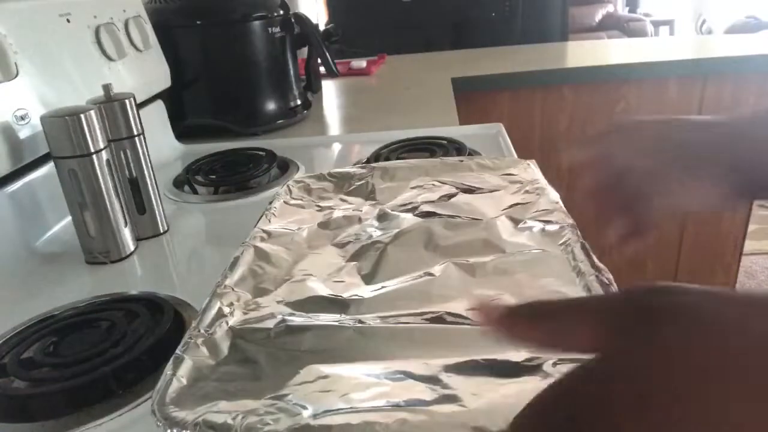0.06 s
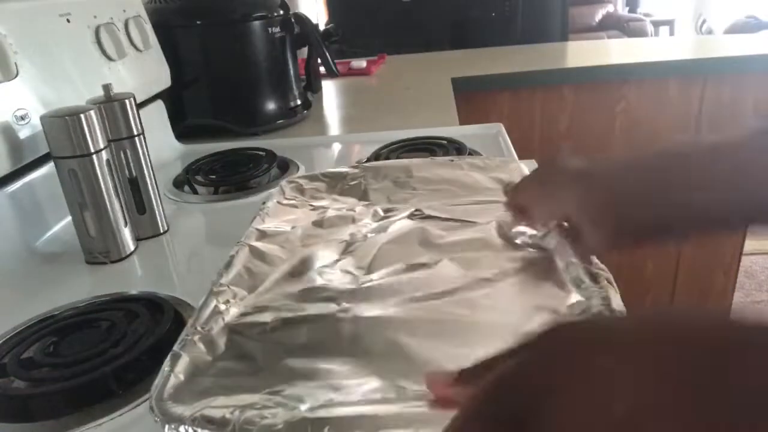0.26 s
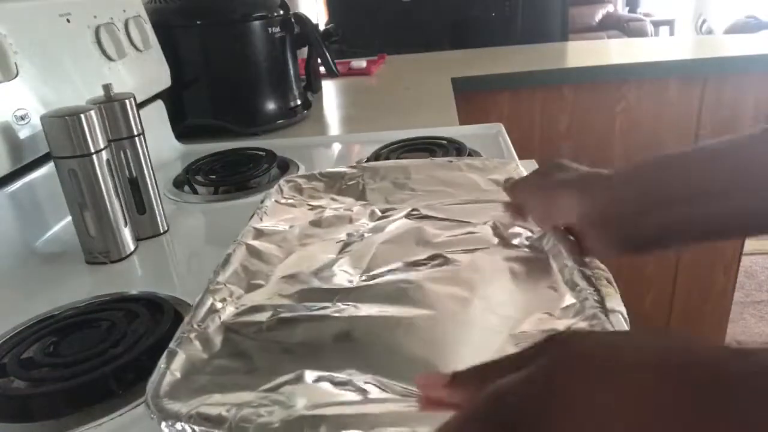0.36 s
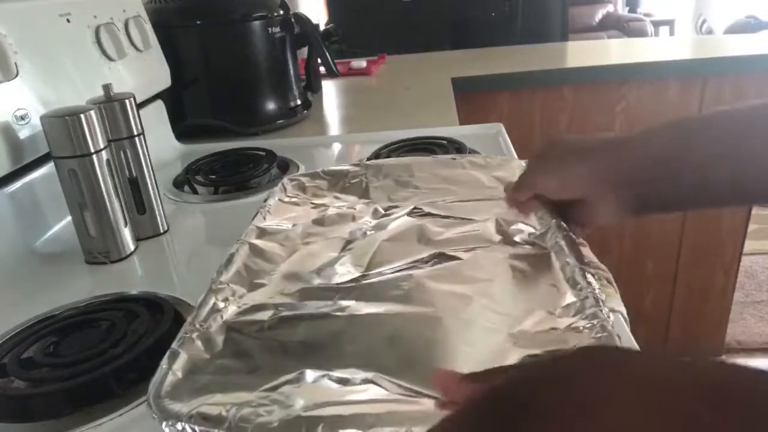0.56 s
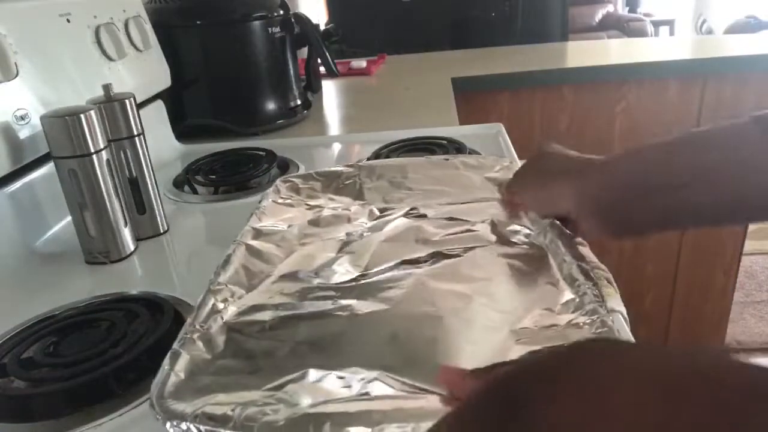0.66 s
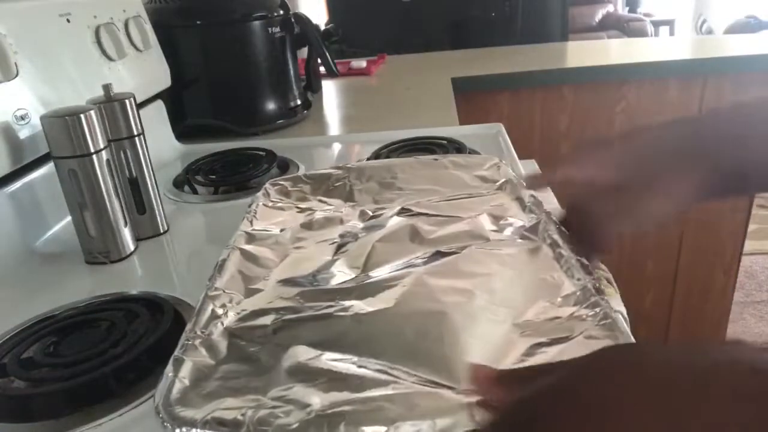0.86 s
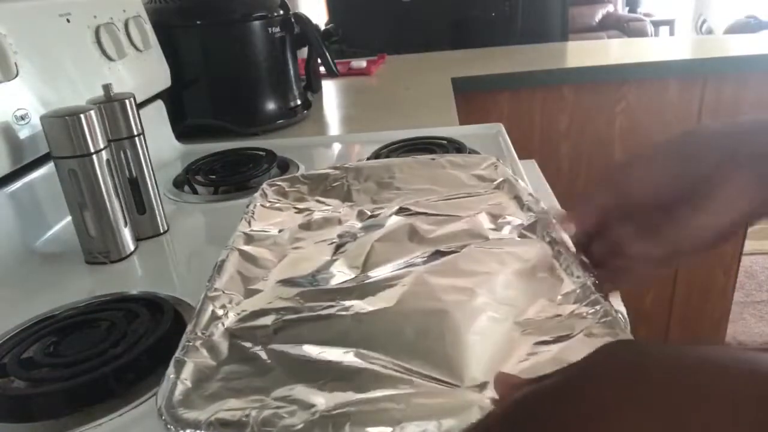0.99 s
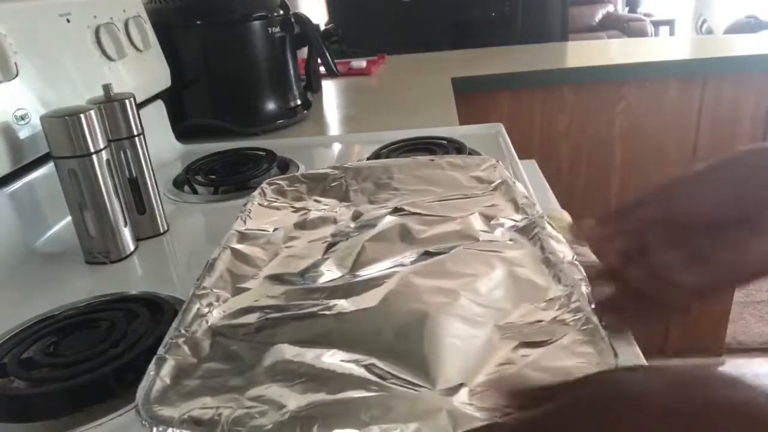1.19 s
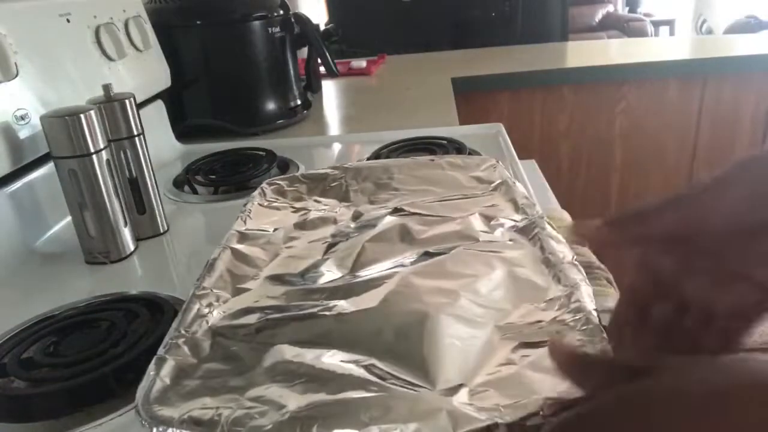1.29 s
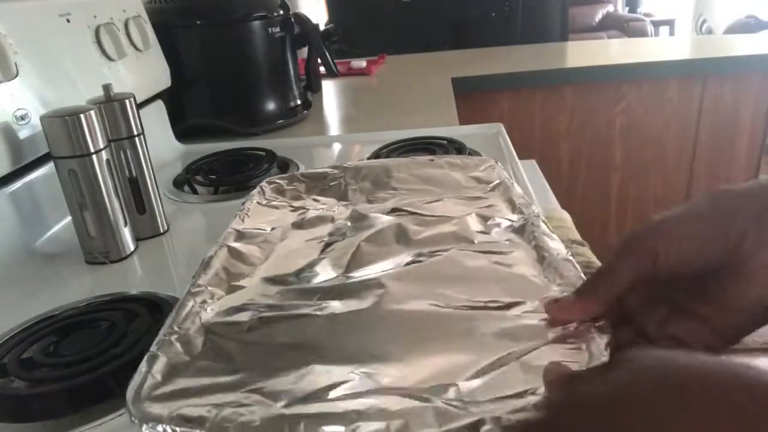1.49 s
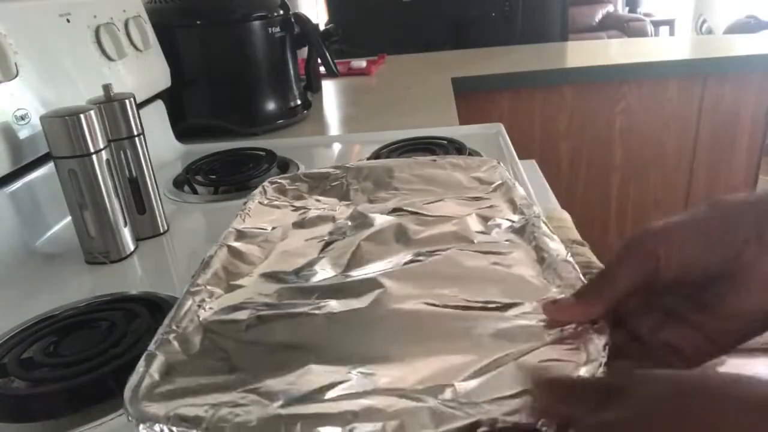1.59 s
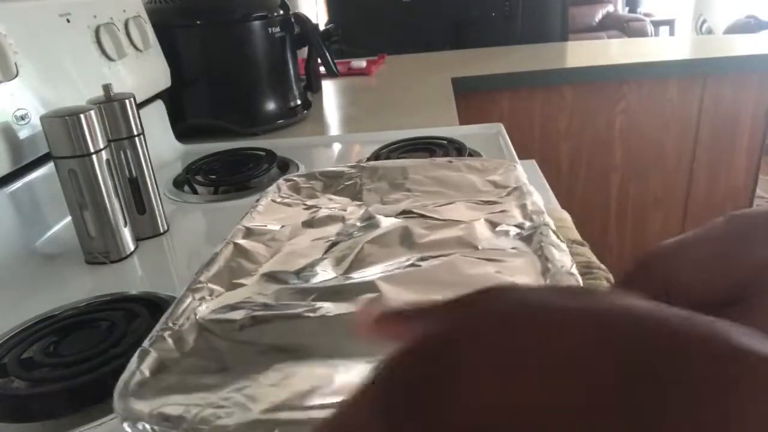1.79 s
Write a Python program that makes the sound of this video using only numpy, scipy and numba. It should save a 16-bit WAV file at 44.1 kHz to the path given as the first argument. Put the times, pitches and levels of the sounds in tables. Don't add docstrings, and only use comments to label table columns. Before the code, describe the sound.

Crackling foil being tucked and folded over a pan, close up, in a quiet humming kitchen

```python
import sys
import numpy as np
from scipy import signal
from scipy.fft import rfft, irfft
from scipy.io import wavfile
from scipy.ndimage import map_coordinates
from numba import njit

SR = 44100
rng = np.random.default_rng(int(sys.argv[2]) if len(sys.argv) > 2 else 0)


def voltage_ratio(level):
    return 10 ** (np.asarray(level, float) / 20)


def output_pcm(signal):
    pcm = np.clip(np.atleast_2d(signal).T, -1, 1) * 32767
    wavfile.write(sys.argv[1], SR, np.round(pcm).astype(np.int16))


N = 81585

# (frequency [Hz], level [dB per Hz])
AIR_COLOUR = [(30, -29), (55, -11.5), (110, -8.5), (230, -18), (320, -9), (620, -26), (1100, -26.5),
              (15000, -50)]
# (frequency [Hz], time to fade by 60 dB [s], level [dB])
ROOM_BANDS = [(262, 0.57, -1), (670, 0.64, -7), (1940, 0.34, -3.5), (4450, 0.26, -7), (11000, 0.37, -21)]
# (frequency [Hz], level [dB per Hz])
FOIL_COLOUR = [(250, -21), (630, -22.5), (1100, -7), (2000, -7.5), (3700, -3.5), (8000, -4), (12000, -8.5),
               (15500, -9)]

# (time [s], peak level [dB], hold [s], brightness [dB per octave])
FIRST_PRESS = [(0.1617, -33, 0.005, 5), (0.1625, -22, 0.0042, 4), (0.182, -26, 0.006, -1),
               (0.196, -24, 0.0052, -1), (0.197, -13, 0.0046, -1), (0.217, -13, 0.0061, 0.2),
               (0.226, -24, 0.0062, 0), (0.244, -22.5, 0.006, 0), (0.254, -22.5, 0.0069, -3.5),
               (0.264, -12.5, 0.004, -3), (0.272, -7.5, 0.0082, 3), (0.281, -5.5, 0.0057, 0),
               (0.291, -3, 0.0067, 0.2), (0.2966, -4.5, 0.0078, 9), (0.308, -8, 0.0053, 0.5),
               (0.314, -3.5, 0.0071, 2.5), (0.3287, -2, 0.0048, 6.5), (0.339, -8, 0.011, 8.5),
               (0.349, -4.5, 0.005, 3), (0.354, -5, 0.0056, 2), (0.364, -15.5, 0.0055, 2),
               (0.379, -15, 0.0052, 6.5), (0.3993, -17, 0.0064, 9), (0.4072, -14, 0.0066, -0.5),
               (0.438, -10, 0.0069, 0.3), (0.445, -11, 0.01, 1), (0.469, -15.5, 0.0055, 0.1),
               (0.476, -16.5, 0.0057, 1), (0.493, -12, 0.0062, -0.5), (0.501, -20.5, 0.0045, -5)]
RIM_TUCK = [(0.5656, -18, 0.0052, -3.5), (0.574, -15.5, 0.0059, 3), (0.586, -19.5, 0.006, -3.5),
            (0.6014, -20.5, 0.0093, -0.5), (0.624, -20.5, 0.0066, -3), (0.643, -13.5, 0.0073, 1.3),
            (0.655, -14, 0.0095, 0.1), (0.672, -12.5, 0.0064, 2), (0.682, -11.5, 0.0053, -1.7),
            (0.6956, -12.5, 0.0039, 0), (0.708, -16.5, 0.0073, -2), (0.726, -11, 0.012, 1),
            (0.746, -16, 0.0037, -1.5), (0.7586, -11, 0.0097, -0.6), (0.8077, -18, 0.0069, -2.3),
            (0.823, -9, 0.007, 2.5), (0.8337, -8.5, 0.0053, 0.1), (0.8516, -10.5, 0.0032, 1.2),
            (0.858, -13.5, 0.0047, 4.5), (0.868, -14.5, 0.0057, 0.5), (0.876, -18.5, 0.0041, -0.5)]
EDGE_PINCH = [(0.987, -27, 0.0062, -3), (1.0106, -20.5, 0.0041, -1), (1.019, -14.5, 0.007, -0.1),
              (1.0344, -21, 0.0054, -2.8), (1.057, -15, 0.004, -3), (1.064, -18.5, 0.0036, -3.5),
              (1.0804, -10.5, 0.0054, 2.5), (1.0894, -13.5, 0.0037, -1), (1.107, -19, 0.0041, -3.8),
              (1.13, -9.5, 0.0054, 1.4), (1.163, -20, 0.0061, -3.5), (1.201, -16.5, 0.0044, 6.5),
              (1.21, -18.5, 0.006, -2.5), (1.218, -23.5, 0.008, 2.5), (1.233, -20.5, 0.0088, -2),
              (1.243, -21.5, 0.0067, -4)]
CORNER_FOLD = [(1.3888, -20.5, 0.0047, -2.8), (1.3967, -20.5, 0.0068, -2), (1.4127, -8.5, 0.005, 1),
               (1.429, -12.5, 0.0061, 1), (1.442, -9.5, 0.0067, 2), (1.4496, -9.5, 0.0049, 0.5),
               (1.463, -13.5, 0.0056, -1.5), (1.493, -22.5, 0.0076, -1.5), (1.518, -4.5, 0.006, 4.5),
               (1.527, -3.5, 0.0091, -1), (1.536, -3.5, 0.0072, 7.5), (1.548, -5, 0.0068, 0.3),
               (1.5593, -8, 0.0092, -0.5), (1.582, -20.5, 0.0051, 3.5), (1.638, -29.5, 0.005, 0),
               (1.803, -33.5, 0.0072, -4.5), (1.833, -32, 0.0022, -4.5), (1.846, -28.5, 0.004, -5)]
SETTLING = [
    (1.707, -40.5, 0.017, -7.5),
]
# (time [s], peak level [dB], decay [s], brightness [dB per octave])
CRACKS = [(0.165, -19, 0.0028, -3), (0.1945, -16, 0.0011, 6), (.200, -16, 0.0043, 0),
          (0.2111, -6.5, 0.0068, 0), (0.24, -16, .003, 2), (0.3304, 4.5, 0.0037, 1), (0.3446, 1, 0.0027, 3),
          (.602, -21, .004, 2), (0.9795, -17, 0.0038, -2), (1.0015, -15, .004, -1),
          (1.0193, -16, 0.0037, -3), (1.061, -22, .003, -2), (1.084, -12.5, .003, -2),
          (1.1052, -11, .003, 0), (1.1586, -10, 0.0036, 6), (1.197, -15, .003, -1), (1.206, -12.5, .004, 0),
          (1.38, -25, 0.0032, -4.5), (1.4133, -8, 0.0045, 7), (1.443, -6, 0.0026, 8),
          (1.4868, -10, 0.0037, 2.5), (1.5161, -6, 0.0074, 1.5), (1.633, -20.5, .003, 5),
          (1.128, -15, 0.0044, -2), (1.4387, -13, .004, 3), (.2725, -14, .004, 2), (1.8018, -27, 0.0038, 3),
          (1.8415, -19, .006, -2)]

SNAPS = [(.164, -17, 5000), (.332, -5, 9000), (.472, -4, 8500), (.8047, -4, 5600), (1.104, -12, 6500),
         (1.1595, -13, 9000), (1.416, -7, 10000), (1.4857, -7, 9000), (1.634, -26, 6000),
         (1.0815, -13, 9000), (1.4415, -10, 8000)]
TICKS = [(0.1611, -29.0, 9400), (0.1872, -30.0, 6000), (0.1962, -19.0, 8700), (0.2123, -16.0, 5500),
         (0.2396, -20.0, 8900), (0.5637, -28.0, 7800), (0.603, -22.0, 5100), (0.6254, -24.0, 5000),
         (0.9185, -33.0, 3800), (0.98, -28.0, 5800), (1.0025, -24.0, 5800), (1.0122, -22.0, 5000),
         (1.0208, -16.0, 6700), (1.0406, -25.0, 4800), (1.0563, -24.0, 4400), (1.0602, -19.0, 4800),
         (1.3821, -31.0, 4200), (1.5168, -13.0, 8300), (1.6766, -35.0, 5700), (1.751, -44.0, 3700),
         (1.7557, -43.0, 3100), (1.7862, -51.0, 3900), (1.8025, -34.0, 6500), (1.8346, -35.0, 4200)]
POPS = [(.158, -28.5, 1120), (.2, -26.5, 1200), (.241, -23.5, 1140), (.43, -22.5, 1640), (.979, -26, 1300),
        (1.062, -21, 1330), (1.08, -31.5, 312), (1.245, -26, 1380), (1.413, -26, 1106),
        (1.4145, -24.5, 820), (1.415, -33.5, 430), (1.804, -39, 1050)]
PINGS = [(.164, -25.5, 5150), (.33, -29.5, 788), (.51, -38.5, 554), (1.012, -32.5, 3100),
         (1.088, -22, 3550), (1.132, -25.5, 4350), (1.135, -36.5, 880), (.979, -33, 4570),
         (1.209, -28.5, 3390), (1.463, -24.5, 4240), (1.676, -34.5, 5360), (1.845, -40, 1630)]
PANEL_RING = [
    (.93, -46, 1094),
]


def level(x, db):
    return x * voltage_ratio(db) / np.sqrt(np.mean(x ** 2))


def curve(hz, points):
    point_hz, value = np.array(points, float).T
    return np.interp(np.log(np.maximum(hz, 1)), np.log(point_hz), value)


def shaped(x, gain_db):
    hz = np.fft.rfftfreq(len(x), 1 / SR)
    return irfft(rfft(x) * voltage_ratio(gain_db(hz)), len(x))


@njit
def rings(n, start, hz, cycles, size):
    out = np.zeros(n)
    for k in range(len(start)):
        turn = np.exp((2j * np.pi - 1 / cycles[k]) * hz[k] / SR)
        first = int(start[k] * SR)
        z = size[k] * turn ** (first + 1 - start[k] * SR)
        last = min(n, first + int(6 * cycles[k] * SR / hz[k]))
        for j in range(first + 1, last):
            out[j] += z.imag
            z *= turn
    return out


def kitchen():
    air_db, hum_hz, hum_db, waver_db = -51, 238, -57.5, 1.2
    motor_hz, motor_db, motor_on_s, motor_rise_s = 99.5, -61, 1.1, 0.2
    t = np.arange(N) / SR
    air = shaped(rng.standard_normal(N), lambda f: curve(f, AIR_COLOUR))
    slow_noise = shaped(rng.standard_normal(N), lambda f: -40 * np.log10(1 + f / 3))
    waver = level(slow_noise, 0)
    hum = np.sin(2 * np.pi * hum_hz * t) * voltage_ratio(waver_db * waver)
    motor = voltage_ratio(motor_db) * np.sqrt(2) * np.sin(2 * np.pi * motor_hz * t)
    motor = motor * np.clip((t - motor_on_s) / motor_rise_s, 0, 1)
    return level(air, air_db) + level(hum, hum_db) + motor


def room(x):
    t = np.arange(SR // 2) / SR
    build_up = np.clip(t / 0.0013 - 0.3, 0, 1)
    tail = 0
    for hz, t60, db in ROOM_BANDS:
        noise = rng.standard_normal(len(t))
        band = shaped(noise, lambda f: -9 * np.log2(np.maximum(f, 1) / hz) ** 2)
        band = band * voltage_ratio(-60 * t / t60) * build_up
        band_size = voltage_ratio(db) * np.sqrt(hz / 20000)
        tail = tail + band * band_size / np.sqrt(np.sum(band ** 2))
    return signal.fftconvolve(x, tail)[:N]


def earlier_sound():
    return voltage_ratio(-31) * rng.standard_normal(N) * (np.arange(N) < 40)


def hits(table, cycles, spread, count):
    scatter_cycles = 4.44
    when, db, hz = np.repeat(np.array(table, float), count, axis=0).T
    u = rng.random((len(when), 3)).T
    if count > 1:
        when = when + u[0] * scatter_cycles / hz
    hz = np.minimum(hz * np.exp(spread * (2 * u[1] - 1)), 15000.0)
    size = voltage_ratio(db) / np.sqrt(count) * np.sign(u[2] - 0.5)
    return rings(N, when, hz, np.full(len(when), float(cycles)), size)


def panels_and_facets():
    pops = hits(POPS, cycles=2.5, spread=0.02, count=1)
    hum_on = hits(PANEL_RING, cycles=110, spread=0.002, count=1)
    pings = hits(PINGS, cycles=12, spread=0.013, count=1)
    return pops + hum_on + pings


def snaps_and_ticks():
    low_hz, tick_lift_db = 2500, 2.5
    snaps = hits(SNAPS, cycles=1.54, spread=0.47, count=10)
    ticks = hits(TICKS, cycles=1.54, spread=0.5, count=10)
    both = snaps + voltage_ratio(tick_lift_db) * ticks
    return shaped(both, lambda f: -10 * np.log10(1 + (low_hz / (f + 1)) ** 4))


def patchy(when, hz):
    patch_s, patches_per_octave = 0.006, 2.225
    field = rng.standard_normal((int(N / SR / 0.002) + 2, 16))
    place = [when / patch_s, patches_per_octave * np.log2(hz / 200)]
    return map_coordinates(field, place, order=1, mode="wrap")


def crease_power(when, hz):
    attack_s, release_s, bass_lingers = 0.0061, 0.0052, 0.18
    release = release_s * (6000 / hz) ** bass_lingers
    power = np.zeros(len(when))
    for start, db, hold, tilt_db in FIRST_PRESS + RIM_TUCK + EDGE_PINCH + CORNER_FOLD + SETTLING:
        age = when - start
        swell = np.clip(age / attack_s + 0.73, 0, 1)
        fade = np.exp(-np.maximum(age - hold, 0) / (release + 0.59 * hold))
        colour_db = tilt_db * np.log2(np.clip(hz, 1000, 10500) / 6000)
        power += (swell * fade * voltage_ratio(db + colour_db)) ** 2
    for start, db, decay, tilt_db in CRACKS:
        age = when - start
        shape = (age > 0) * np.exp(-np.maximum(age, 0) / decay)
        colour_db = tilt_db * np.log2(np.maximum(hz, 1000) / 6000)
        power += (shape * voltage_ratio(db + colour_db)) ** 2
    return power


def swarm(count=60000, places=4):
    swarm_db, click_spread_db, click_cycles, patchy_db = -17, 2, 3.72, 2.5
    u = rng.random((count, 5)).T
    when = u[0] * N / SR
    hz = 200 + 15600 * u[1] ** 2
    cycles = click_cycles * (0.3 - np.log(u[3] + 0.013))
    size_db = swarm_db + curve(hz, FOIL_COLOUR) + 15 * np.log10(hz / 6000)
    size_db = size_db - click_spread_db * np.log(u[2] + 0.0024)
    size_db = size_db + patchy_db * patchy(when, hz)
    size = np.sqrt(crease_power(when, hz)) * voltage_ratio(size_db) * np.sign(u[4] - 0.5)
    patches = []
    for k in range(places):
        mine = slice(k * count // places, (k + 1) * count // places)
        patches.append(rings(N, when[mine], hz[mine], cycles[mine], size[mine]))
    return patches


def scene():
    foil_low_hz = 245
    patches = swarm() + [snaps_and_ticks() + panels_and_facets()]
    foil = sum(patch + room(patch) for patch in patches) + room(earlier_sound())
    no_bass = signal.butter(2, foil_low_hz, "high", fs=SR, output="sos")
    return (signal.sosfilt(no_bass, foil) + kitchen())[None]


def roll_off(x):
    return signal.sosfilt(signal.butter(12, 16850, fs=SR, output="sos"), x)


def treble_gain(f):
    port = 7.5 / (1 + ((f - 11580) / 1200) ** 2)
    step_down = -7 / (1 + np.exp((12400 - f) / 150))
    notch = -5 * np.exp(-((f - 13350) / 200) ** 2)
    return port + step_down + notch


def band_limits(f):
    top_hz, rumble_hz = 15900, 35
    top = -90 / (1 + np.exp((top_hz - f) / 60))
    return top - 10 * np.log10(1 + (rumble_hz / (f + 1)) ** 4)


def record(dry):
    clip = 1.25
    heard = shaped(dry[0], treble_gain)
    rounded = clip * np.tanh(heard / clip)
    mix = shaped(rounded, band_limits)[None]
    return roll_off(mix)


dry = scene()
out = record(dry)
output_pcm(out)
```